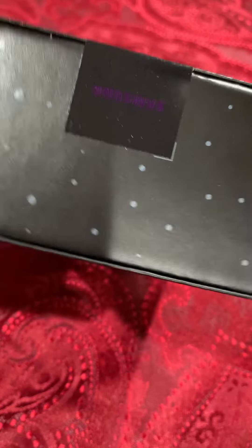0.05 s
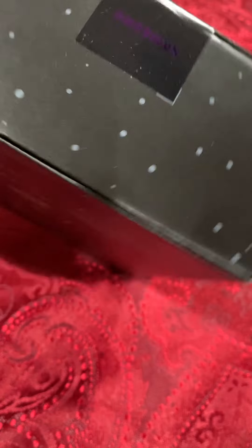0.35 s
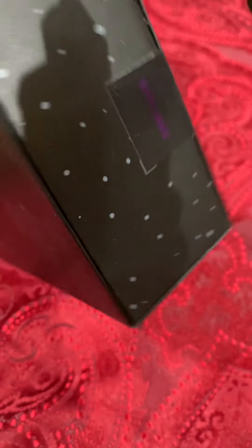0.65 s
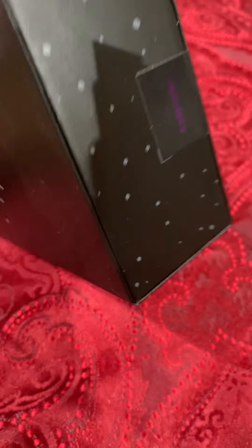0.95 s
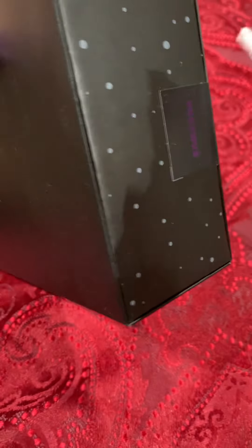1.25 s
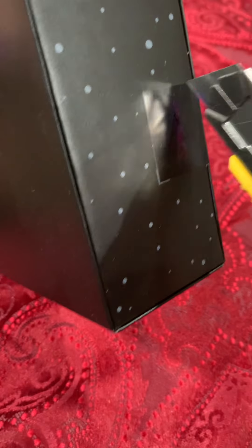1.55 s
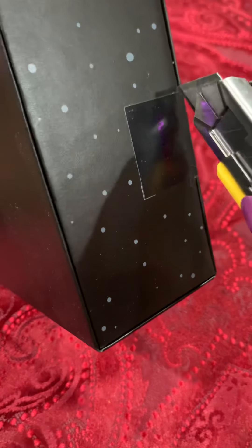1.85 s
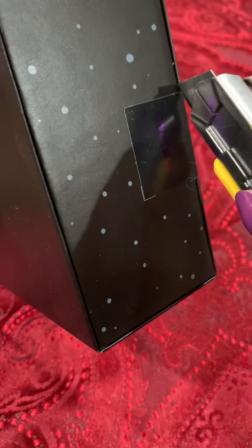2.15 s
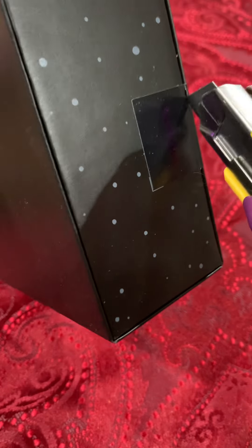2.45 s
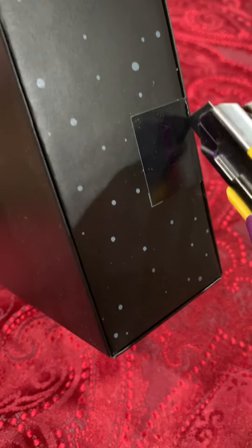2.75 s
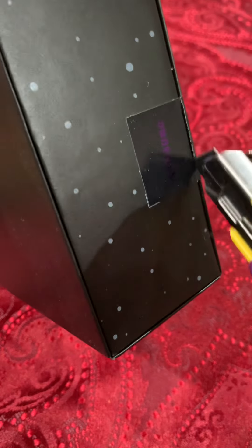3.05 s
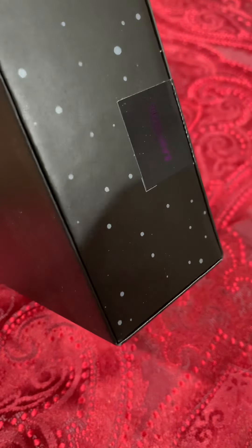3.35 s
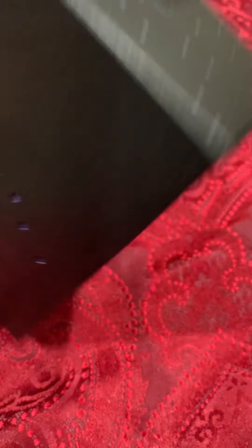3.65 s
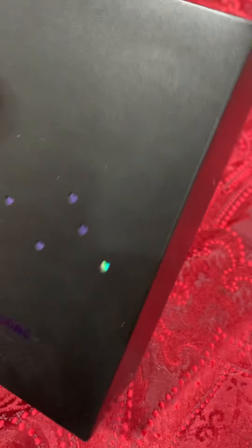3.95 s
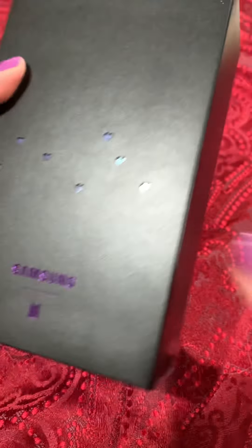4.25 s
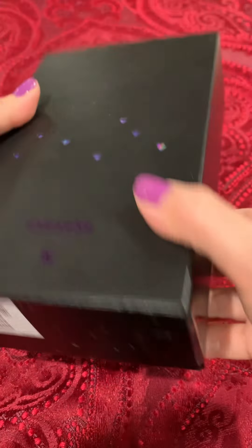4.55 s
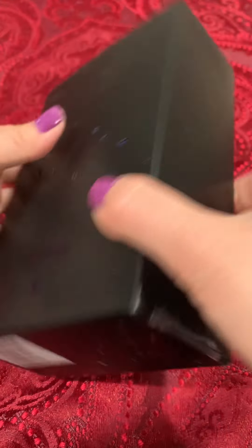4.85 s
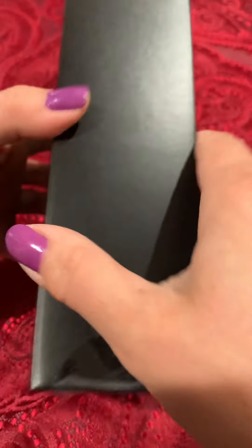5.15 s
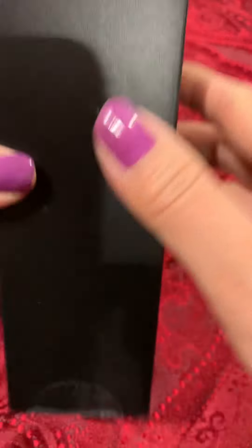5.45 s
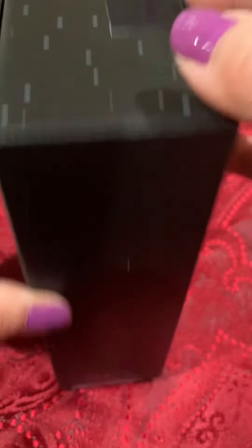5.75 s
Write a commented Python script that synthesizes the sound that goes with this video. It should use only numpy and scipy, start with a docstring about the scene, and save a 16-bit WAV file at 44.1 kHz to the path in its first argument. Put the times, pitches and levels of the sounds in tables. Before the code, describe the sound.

Close up in a small, faintly humming room, a cardboard box is handled with light rubbing and a soft knock. A blade tip ticks and scratches at the sticker sealing it until the seal gives with a crisp pop. The box then lands and rocks on a cloth-covered table, thudding dully as the things inside shift, and fingers slide over the card, bumping it now and then.

```python
"""A stiff cardboard box is unsealed and tipped over on a cloth-covered table, close to a phone.
A craft knife picks at the seal sticker, scrapes and snaps through it, ringing the card walls and
the air inside. The box lands with dull thuds, crumbly slaps and a jostle of its contents, then
fingers hiss and rustle along its smooth sides. A faint hum lies under it all in the small room."""
import sys
import numpy as np
from scipy import signal
from scipy.fft import rfft, irfft, next_fast_len
from scipy.io import wavfile

SR = 44100
rng = np.random.default_rng(int(sys.argv[2]) if len(sys.argv) > 2 else 0)


def unload_audio(sound):
    """Save the sound as a 16-bit wav file, at the path given as the first command line argument."""
    columns = np.transpose(np.atleast_2d(sound))
    # keep every value between -1 and 1, then stretch to whole-number steps
    steps = np.round(np.clip(columns, -1, 1) * 32767)
    wavfile.write(sys.argv[1], SR, steps.astype(np.int16))


N = 264159
TIME = np.arange(N) / SR
RING_TIME = np.arange(int(.7 * SR)) / SR

# The knife tip picks at the sticker. Each row: start in seconds, length in seconds, level in dB,
# treble and hollow ring over that level in dB, pitch of the hollow in Hz.
PICKS = [(1.8432, 0.006, -61.5, -40, 9, 340), (1.9025, 0.006, -60.5, -35, 6, 343),
         (1.939, 0.013, -49, -27, -8, 390), (1.962, 0.01, -53.5, -31, 1, 367),
         (2.006, 0.017, -59.5, -24, 1, 366), (2.343, 0.015, -42, -4.5, 9, 318),
         (2.502, 0.0093, -50, -2.5, -7.5, 319), (2.742, 0.011, -55, -6, -1.5, 357),
         (2.76, 0.027, -47, -5, -1.5, 357), (2.805, 0.0097, -50, -7, -14.5, 366),
         (3.0305, 0.013, -31.5, -5, 6, 365.3)]
# Tone of a hard snap on card. Each row: frequency in Hz, level in dB.
SNAP_TONE = [(150, -61), (700, -12), (1500, -10.5), (2700, -0.5), (4100, -1), (5200, 6.5), (7300, 3.5),
             (9500, 2), (12500, 1), (14500, -5.5), (16000, -20.5)]
# The tipped box lands. Each row: start in seconds, level in dB, pitch in Hz, settling time in seconds.
LANDINGS = [(3.5861, -18.5, 264, 0.029), (3.62, -26, 154, 0.018), (3.809, -19, 182, .014),
            (3.971, -9.5, 233, 0.0232), (4.021, -24.5, 290, 0.018)]
# Corners and faces slap down as it rocks. Each row: start in seconds, wall ring in dB,
# snap over the ring in dB, centre of the ring in Hz.
SLAPS = [(3.5894, -44.5, 11.5, 1255), (3.5993, -45, 15.5, 1250), (3.613, -43.5, 5, 1650),
         (3.6208, -42.5, 8, 1440), (3.8259, -45.5, 2.5, 1380), (3.8285, -46, -17.5, 4300),
         (3.9763, -40.5, 1.5, 1310), (3.984, -45.5, 2, 1250), (3.9922, -44, 7.5, 1320),
         (3.998, -37, 2.5, 4400), (4.0135, -43.5, -5, 4100), (4.042, -48, -2, 1390),
         (4.0518, -40, -10, 1360), (4.056, -42, -0.5, 1336), (4.078, -50.5, -14, 1360)]
# Hands bump the box against the table. Each row: start in seconds, level in dB, pitch in Hz.
BUMPS = [(0.243, -46, 295), (1.114, -28.5, 63), (2.362, -38, 125), (2.515, -41.5, 72.6),
         (4.251, -37.5, 57.6), (4.336, -30.5, 239), (4.623, -44, 436), (5.063, -25.5, 72.5),
         (5.274, -36, 502), (5.803, -37, 66.2), (5.969, -27.5, 120)]


def seal_pops(pop_s=0.00037):
    """The card flexes back in a cycle or two each time the seal lets go."""
    # Each row: time in seconds, peak in dB, pitch in Hz.
    releases = [(1.8455, -39.5, 1110), (1.9048, -47, 1480), (1.9401, -38, 1620), (2.339, -28.5, 1815),
                (2.3473, -25.5, 1050), (2.359, -35.5, 1880), (2.374, -38, 1800), (2.5026, -38.5, 1560),
                (3.030, -13, 1712), (3.0411, -16.5, 1700), (3.0538, -28, 1810)]
    out = np.zeros(N)
    t = np.arange(-SR // 200, SR // 200) / SR
    for s, db, hz in releases:
        add(out, s + t[0], undb(db) * np.exp(-(t / pop_s) ** 2) * np.cos(2 * np.pi * hz * t))
    return out


def knife_picks(wall_db=-2, hollow_db=4, catch_s=0.0062, fall_db=-11.5, ring_hz=1700):
    """The tip catches in a quick, fading run: each catch rings the walls, the whole pull the hollow."""
    boom, catches = np.zeros(N), []
    for s, length, db, treble_db, boom_db, boom_hz in PICKS:
        add(boom, s, undb(db + boom_db + hollow_db) * hollow_ring(boom_hz, length))
        for after in np.arange(0, length, catch_s):
            force_db = db + fall_db * after / length
            catches.append((s + after, force_db + treble_db, force_db + wall_db, ring_hz))
    ticks = taps(catches, snap_t60=0.0046, octaves=0.11, reject_db=16.5)
    return boom + ticks + skid(catches, skid_db=-21.5, rise_s=0.0022, fall_s=0.01)


def blade_scrape(flutter_db=1.5, pick_db=0.5, pick_edge_db=-2, bite_s=0.006, drag_edge_db=-4):
    """The blade bites in a pick and swells in a drag; its slips shake the box and its edge crackles."""
    # Drags through the sticker. Each row: peak time in seconds, half length in seconds, level in dB.
    drags = [(2.351, 0.037, -56), (2.677, 0.0093, -52), (2.765, 0.037, -44), (3.006, 0.054, -51),
             (3.077, 0.049, -44.5)]
    # Tone of the scraped box. Each row: frequency in Hz, level in dB.
    scrape_tone = [(120, 2), (260, 1), (370, 5.5), (520, -1), (740, -8.5), (1000, 3), (1400, -9.5),
                   (1800, -2.5), (2400, -7.5), (3200, -45.5), (4300, -28), (8000, -35)]
    strokes = [(undb(db + pick_db) * swell(s + bite_s, bite_s, length), treble_db + pick_edge_db)
               for s, length, db, treble_db, *_ in PICKS]
    strokes += [(undb(db) * swell(s, width, width), drag_edge_db) for s, width, db in drags]
    body = sum(push for push, _ in strokes)
    edge = sum(push * undb(treble_db) for push, treble_db in strokes)
    slips = grains(rate=2600, spread_db=1.0) * undb(flutter_db * walk(160))
    return body * unit(colour(slips, scrape_tone)) + edge * unit(colour(slips, SNAP_TONE))


def card_clicks(touch_db=-3.5, touch_snap_db=-8):
    """Blade, nails and edges click on the card, often with a lighter touch just before."""
    # Each row: start in seconds, wall ring in dB, snap over the ring in dB, centre of the ring in Hz,
    # lead of the lighter touch in seconds (0 for none).
    clicks = [(0.2164, -37.5, -1, 2840, 0), (0.969, -56.5, -1, 1300, 0), (1.565, -49.5, -0.5, 2450, 0.0014),
              (1.753, -63, 8.5, 2450, 0), (3.0337, -33.5, 11, 1900, 0.00054),
              (3.0488, -38, 7.5, 1810, 0.0021), (3.051, -40, 6, 1740, 0.0015),
              (3.1462, -49, 5.5, 2340, 0.0036), (3.251, -73, -11, 1928, 0.0012),
              (3.398, -47.5, 10.5, 1662, 0.015), (3.743, -61, 5, 1530, 0.0057),
              (4.333, -60.5, 9.5, 1328, 0.025), (5.274, -62.5, 0, 1370, 0),
              (5.906, -61, 11.5, 1510, 0.00077), (5.922, -52, 10.5, 2130, 0),
              (5.971, -53.5, 4.5, 1420, 0.004)]
    contacts = [(s, db + snap_db, db, hz) for s, db, snap_db, hz, _ in clicks]
    contacts += [(s - lead, db + snap_db + touch_db + touch_snap_db, db + touch_db, hz)
                 for s, db, snap_db, hz, lead in clicks if lead > 0]
    ticks = taps(contacts, snap_t60=.009, octaves=0.49, reject_db=22.5)
    return ticks + skid(contacts, skid_db=-8.5, rise_s=0.0022, fall_s=0.011)


def landing_blows(step_db=-4, pitch_ratio=0.554):
    """Corner, edge and face come down in turn, each blow weaker and deeper than the last."""
    return [(s + settle_s * k / 2, db + k * step_db, hz * pitch_ratio ** k)
            for s, db, hz, settle_s in LANDINGS for k in range(3)]


def table_thuds(blows, gain_db, ring_db, damping=0.56, cloth_hz=520, travel_s=0.00653):
    """Cloth-cushioned blows bend the table top: the highs arrive first, then its modes ring on."""
    # Each row: frequency in Hz, level in dB, decay to -60 dB in seconds.
    table_modes = [(58.8, -4, 0.53), (87.9, -2.5, 0.24), (135.7, -1, .23), (200.6, -4.5, .22),
                   (236.7, -7.5, .34), (279.3, -4, 0.26), (299.2, 1, 0.2), (367.4, -6.5, 0.25),
                   (414, -8, 0.14), (486, -6.5, 0.14), (516.4, -0.5, 0.26), (660, -5, .15)]
    out = np.zeros(N)
    f = np.fft.rfftfreq(len(RING_TIME), 1 / SR)
    cloth = 1 / (1 + (f / cloth_hz) ** 8)
    bending = np.exp(-4j * np.pi * travel_s * np.sqrt(100 * f))  # travel_s is the delay at 100 Hz
    for s, db, hz in blows:
        w = 1j * f / hz
        bounce = w / (1 + damping * w + w * w)
        thud = irfft(bounce * cloth * bending)[:SR // 10]
        modes = ring(table_modes, scatter_db=3, detune=.012)
        sound = undb(ring_db) * signal.fftconvolve(thud, modes)
        sound[:len(thud)] += thud
        add(out, s, sound * undb(db + gain_db) / np.abs(sound).max())
    return signal.sosfilt(signal.butter(3, 42, "high", fs=SR, output="sos"), out)


def card_slaps(crease_db=-8, crease_s=0.015):
    """The card slaps down and skids, then creases, which keeps its walls ringing."""
    contacts = [(s, db + snap_db, db, hz) for s, db, snap_db, hz in SLAPS]
    slaps = taps(contacts, snap_t60=0.008, octaves=0.27, reject_db=14)
    skids = skid(contacts, skid_db=-7, rise_s=0.0025, fall_s=0.004)
    strain = sum(undb(db + crease_db) * swell(s + .003, .003, crease_s) for s, db, *_ in SLAPS)
    walls = wall_ring(db=0, centre_hz=1300, octaves=.3, reject_db=11)
    walls /= np.sqrt(np.sum(walls ** 2))
    creases = signal.fftconvolve(strain * grains(rate=1500, spread_db=1.5), walls)[:N]
    return slaps + skids + creases


def contents_jostle(jostle_db=-20, jostle_s=0.0287):
    """The packed contents shake inside the box after each landing."""
    # Each row: frequency in Hz, level in dB.
    contents_tone = [(40, 0), (80, 8), (170, -4), (280, 1), (400, 2.5), (560, -16.5), (750, -25.5),
                     (1200, -35)]
    shaking = sum(undb(db + jostle_db) * swell(s + .008, .005, jostle_s) for s, db, *_ in LANDINGS)
    return shaking * unit(colour(grains(rate=890, spread_db=1.5), contents_tone))


def sliding_hands(rustle_db=-3.0, palm_db=-9, grip_db=-26):
    """Skin hisses on the card and murmurs in the hollow; coarser slips rustle and ring the panels."""
    # Fingers and cloth sweep the box. Each row: peak time in seconds, half length in seconds,
    # hiss in dB, rustle over the hiss in dB, panel resonance in Hz, its level over the rustle in dB,
    # centre of the hiss in Hz.
    sweeps = [(0.099, 0.045, -62.5, 3, 1800, -7.5, 7640), (0.191, 0.038, -60.5, 4, 2080, -4.5, 7050),
              (0.325, 0.084, -69.5, 7.5, 1483, -0.5, 6500), (0.561, 0.087, -73, 8, 1100, -5, 6200),
              (0.794, 0.054, -64, 6.5, 2330, -2, 7140), (0.937, 0.012, -65, 2, 2360, -9, 8050),
              (0.974, 0.01, -75, 27.5, 1137, -7.5, 7000), (1.131, 0.047, -67, 1, 1590, -9.5, 8800),
              (1.388, 0.048, -73, 3, 1600, 0, 6900), (4.325, 0.11, -82.5, 12.5, 1390, -1, 8100),
              (4.53, 0.042, -56.5, -9.5, 1460, -6, 9200), (4.723, 0.043, -47.5, -10, 2440, -10.5, 10440),
              (4.859, 0.036, -57.5, -1, 1670, -16, 8000), (4.994, 0.039, -66.5, -4.5, 2180, -10, 8900),
              (5.154, 0.13, -59, -2.5, 1570, -15, 8300), (5.31, 0.068, -70.5, 1, 1475, 0, 7050),
              (5.457, 0.099, -55.5, -18, 1710, 2.5, 11000), (5.628, 0.098, -63, -5.5, 1440, -14, 9800),
              (5.815, 0.09, -57.5, -5.5, 1718, -12.5, 8150), (5.997, 0.074, -49.5, 1.5, 1300, -19, 8600)]
    # Tones of skin, walls and a palm heard through the box. Each row: frequency in Hz, level in dB.
    skin_tone = [(1000, -16), (3200, -8), (4200, 4), (5200, -0.5), (6500, 5.5), (8500, 3), (10500, 1.5),
                 (12400, -3.5), (14300, 4.5), (15800, 5.5)]
    rustle_tone = [(100, -18), (300, -21), (450, -41), (720, -7), (1050, 1.5), (1650, -4.5), (2400, -2.5),
                   (3100, -3), (3900, -2.5), (5200, -5), (7000, -5), (14000, -39.5)]
    palm_tone = [(90, -18), (220, -0.5), (310, 1.5), (480, -10), (700, -11), (1200, -43.5)]
    slips = grains(rate=1500, spread_db=2.2) * undb(2.5 * walk(60))
    skin = colour(grains(rate=7300, spread_db=-1.0), skin_tone) * undb(1.9 * walk(40))
    pressure, roughness, hiss, panels = np.zeros((4, N))
    for s, width, db, coarse_db, panel_hz, panel_db, skin_hz in sweeps:
        push = undb(db) * swell(s, width, width)
        pressure += push
        roughness += push * undb(coarse_db)
        hiss += push * unit(resonate(skin, skin_hz, width_hz=skin_hz))
        panel = unit(resonate(slips, panel_hz, width_hz=.42 * panel_hz))
        panels += push * undb(coarse_db + panel_db) * panel
    # The grip slips at each bump.
    grip = sum(undb(db + grip_db) * swell(s + 0.0045, 0.0124, 0.0095) for s, db, _ in BUMPS)
    fibres = grains(rate=2600, spread_db=1.5) * undb(2 * walk(90))
    rustle = undb(rustle_db) * roughness * unit(colour(fibres, rustle_tone))
    palm = (undb(palm_db) * np.sqrt(pressure * roughness) + grip) * unit(colour(slips, palm_tone))
    return finger_shimmer(hiss + panels + rustle + palm)


def finger_shimmer(x, depth_db=1.6):
    """As the fingers move, each band of the spectrum swells and sinks by itself."""
    out = 0
    for edge_hz in (1000, 1400, 2000, 2800, 4000, 6000, 8000, 11500):
        band = signal.sosfiltfilt(signal.butter(4, edge_hz, fs=SR, output="sos"), x)
        out += band * undb(depth_db * walk(12))
        x = x - band
    return out + x * undb(depth_db * walk(25))


def taps(contacts, snap_t60, octaves, reject_db):
    """Each contact snaps off the card and rings its walls."""
    out = np.zeros(N)
    for s, snap_db, ring_db, centre_hz in contacts:
        add(out, s, snap(snap_db, snap_t60))
        add(out, s, wall_ring(ring_db, centre_hz, octaves, reject_db))
    return out


def snap(db, t60, scatter_db=3.5, size=2048):
    """The bright, very short crack of a hard contact; each spot has its own colour."""
    spot_tone = [(hz, level + scatter_db * rng.standard_normal()) for hz, level in SNAP_TONE]
    burst = rng.standard_normal(size) * fade(t60)[:size]
    return strike(colour(burst, spot_tone), db)


def wall_ring(db, centre_hz, octaves, reject_db, travel_s=0.001965, size=4096):
    """The card rings briefly, most in the modes that the contact favours."""
    # Each row: frequency in Hz, level in dB, decay to -60 dB in seconds.
    wall_modes = [(900, -14, .025), (1020, -7, .025), (1170, -1, .045), (1297, 1, .065), (1410, 0, .05),
                  (1570, -2, .045), (1722, 1.5, .035), (1900, -.5, .018), (2140, -3, .018),
                  (2450, -4, .025), (2950, -6, .025), (3650, -1, .022), (4080, -1, .024), (4350, -2, .018)]
    favoured = [(hz, level - min(6 * (np.log2(hz / centre_hz) / octaves) ** 2, reject_db), t60)
                for hz, level, t60 in wall_modes]
    sound = ring(favoured, scatter_db=2.5, detune=.008, size=size)
    f = np.fft.rfftfreq(size, 1 / SR)
    radiation = f ** 12 / (f ** 12 + 860. ** 12)  # steep low cut at 860 Hz
    bending = np.exp(-4j * np.pi * travel_s * np.sqrt(1000 * f))  # lows cross the panel more slowly
    return strike(irfft(rfft(sound) * radiation * bending), db)


def hollow_ring(hz, pull_s):
    """The air in the box builds up while the blade pulls on the card, then rings down."""
    # Each row: multiple of the pitch, level in dB, decay to -60 dB in seconds.
    air_modes = [(.86, -9, 0.17), (1, -3.5, .055), (1.201, -13.5, 0.054), (1.5, -22, .03),
                 (1.85, -24.5, .04)]
    held = np.minimum(RING_TIME, pull_s)
    out = 0
    for ratio, db, t60 in air_modes:
        loss = np.log(1000) / t60
        envelope = (1 - np.exp(-loss * held)) * np.exp(-loss * (RING_TIME - held))
        out += undb(db) * envelope * np.sin(2 * np.pi * hz * ratio * RING_TIME)
    return out / np.abs(out).max()


def skid(contacts, skid_db, rise_s, fall_s):
    """Around each contact the two surfaces graze each other and crackle."""
    # Each row: frequency in Hz, level in dB.
    graze_tone = [(300, -26), (750, -10.5), (1100, -2), (1500, -9), (2200, -15), (3000, -8), (4200, 2.5),
                  (9000, -24)]
    fine, coarse = np.zeros((2, N))
    t = np.arange(-SR // 20, SR // 10) / SR
    touch = np.exp(-np.abs(t / np.where(t < 0, rise_s, fall_s)))
    for s, snap_db, ring_db, _ in contacts:
        add(fine, s + t[0], touch * undb(snap_db))
        add(coarse, s + t[0], touch * undb(ring_db))
    slips = grains(rate=4000, spread_db=2.5)
    crackle = fine * unit(colour(slips, SNAP_TONE))
    graze = coarse * unit(colour(slips, graze_tone))
    return undb(skid_db) * (crackle + graze)


def mic_ports(x):
    """Two ports hear a small lag and tilt: lows leave the whole box, treble the point of contact."""
    # Each row: frequency in Hz, lead of the left port in milliseconds, left minus right in dB.
    stereo_image = [(50, 0.034, -1.9), (195, 0.052, -4), (480, 0.022, -3), (780, .4, -1), (1020, .11, -2.5),
                    (1380, 0, -3), (1980, .02, -3), (2750, .11, -1.5), (4050, .06, -.8), (5000, .075, 0),
                    (6100, .118, 0), (9100, .117, 0), (11700, .125, 0), (14800, 0.125, 0)]
    size = next_fast_len(N + 64)
    f = np.fft.rfftfreq(size, 1 / SR)
    hz, *columns = np.transpose(stereo_image)
    lag_ms, tilt_db = (np.interp(np.log(f + 1), np.log(hz), c) for c in columns)
    left = undb(tilt_db / 2)
    right = undb(-tilt_db / 2) * np.exp(-2j * np.pi * f * lag_ms / 1000)
    return irfft(rfft(x, size) * np.array([left, right]), size)[:, :N]


def early_echoes(x, wet_db, size=400):
    """Table, hands and box faces throw back a few quick echoes, different at each port."""
    echoes = rng.standard_normal((2, size)) * (rng.random((2, size)) < .06) * fade(.03)[:size]
    echoes /= np.sqrt(np.sum(echoes ** 2, axis=1, keepdims=True))
    return undb(wet_db) * signal.fftconvolve(x[None], echoes, axes=1)[:, :N]


def room(x, wet_db):
    """Diffuse reflections, different at each port, dying soonest in the treble."""
    # Each row: frequency in Hz, decay to -60 dB in seconds, level in dB.
    decay_bands = [(150, 0.33, 0), (600, 0.36, -1), (1600, 0.32, 0), (3800, 0.32, 0), (5200, 0.2, -5),
                   (7000, 0.21, -2), (9500, 0.21, -.5), (12500, 0.1, -3), (16000, 0.05, -3)]
    hz, t60s, db = np.transpose(decay_bands)
    size = len(RING_TIME)
    log_f = np.log(np.fft.rfftfreq(size, 1 / SR) + 1)
    noise = rfft(rng.standard_normal((2, size)))
    tail = sum(irfft(noise * np.interp(log_f, np.log(hz), band), size) * fade(t60)
               for band, t60 in zip(np.diag(undb(db)), t60s))
    tail *= np.clip(RING_TIME / 0.012 - .3, 0, 1)  # a short gap, then a fade-in
    tail /= np.sqrt(np.sum(tail ** 2) / 2)
    return undb(wet_db) * signal.fftconvolve(x[None], tail, axes=1)[:, :N]


def room_tone(air_db=-68):
    """Low noise of still air and a faint, wavering hum."""
    # Tone of the air and partials of the hum. Each row: frequency in Hz, level in dB.
    air_tone = [(22, -36.5), (45, 6), (78, 3.5), (120, 0), (200, -6.5), (320, -12.5), (500, -21.5),
                (800, -22.5), (1500, -29.5), (4000, -28.5), (10000, -31), (16000, -42.5)]
    hum_partials = [(75.4, -70.5), (177.6, -69), (236.9, -79), (296.1, -86), (479.1, -84.5)]
    air = unit(colour(rng.standard_normal(N), air_tone)) * undb(air_db + 1.3 * walk(30))
    hum = sum(undb(db + 0.4 * walk(2.7)) * np.sqrt(2) * np.sin(2 * np.pi * (hz * TIME + rng.random()))
              for hz, db in hum_partials)
    return air + hum


def ring(modes, scatter_db, detune, size=len(RING_TIME)):
    """Decaying modes; the spot that is struck sets each one's share."""
    hz, db, t60 = np.transpose(modes)[:, :, None]
    share, stretch = rng.standard_normal((2, len(modes), 1))
    t = RING_TIME[:size]
    envelopes = undb(db + scatter_db * share) * np.exp(-np.log(1000) * t / t60)
    return np.sum(envelopes * np.sin(2 * np.pi * hz * (1 + detune * stretch) * t), axis=0)


def grains(rate, spread_db):
    """Stick-slip: tiny releases of uneven size at random moments, about `rate` a second."""
    slips = rng.random(N) < rate / SR
    sizes = rng.standard_normal(N) * undb(spread_db * np.minimum(rng.exponential(size=N), 4))
    return unit(slips * sizes)


def swell(s, rise_s, fall_s):
    """Pressure of one short stroke, greatest at s."""
    distance = np.abs((TIME - s) / np.where(TIME < s, rise_s, fall_s))
    return np.exp(-np.minimum(distance, 20) ** 1.74)


def walk(rate):
    """Random drift through `rate` new values a second."""
    knots = rng.standard_normal(N // 20)
    return 1.82 * np.interp(TIME * rate, np.arange(len(knots)), knots)


def colour(x, tone, size=4096):
    """Minimum-phase equaliser through (Hz, dB) points, so attacks have no pre-ring."""
    hz, db = np.transpose(tone)
    log_f = np.log(np.fft.rfftfreq(size, 1 / SR) + 1)
    cepstrum = irfft(np.log(undb(np.interp(log_f, np.log(hz), db))))
    cepstrum[1:size // 2] *= 2
    cepstrum[size // 2 + 1:] = 0
    return signal.fftconvolve(x, irfft(np.exp(rfft(cepstrum))))[:len(x)]


def resonate(x, hz, width_hz):
    """One broad resonance, run twice for steep sides."""
    b, a = signal.iirpeak(hz, hz / width_hz, fs=SR)
    return signal.lfilter(b, a, signal.lfilter(b, a, x))


def fade(t60):
    """Decay by 60 dB in t60 seconds."""
    return np.exp(-np.log(1000) * RING_TIME / t60)


def strike(x, db):
    """Scale a blow by the rms of its first 10 ms."""
    return x * undb(db) / np.sqrt(np.mean(x[:SR // 100] ** 2))


def undb(db):
    """Decibels to gain."""
    return 10 ** (np.asarray(db) / 20)


def unit(x):
    """Scale to rms 1."""
    return x / np.sqrt(np.mean(x ** 2))


def add(track, s, sound):
    """Mix a sound into a track at s seconds."""
    i = max(int(s * SR), 0)
    track[i:i + len(sound)] += sound[:max(N - i, 0)]


def scene():
    """Everything happens on the table, a hand's length from the phone."""
    knife = card_clicks() + knife_picks() + seal_pops() + blade_scrape()
    hands = sliding_hands()
    landing = card_slaps() + contents_jostle()
    thuds = table_thuds(landing_blows(), gain_db=-4.0, ring_db=-48.5)
    thuds += table_thuds(BUMPS, gain_db=-1.0, ring_db=-52.0)
    early = early_echoes(knife + landing + hands, wet_db=-16)
    reverb = room(knife, wet_db=-20.5) + room(landing, wet_db=-16)
    reverb += room(hands, wet_db=-11) + room(thuds, wet_db=-18)
    direct = mic_ports(knife + landing + thuds + hands + room_tone())
    return direct + early + reverb


def record(dry, hiss_db=-90, low_hz=30, top_hz=16450):
    """The phone adds a little hiss and cuts the deepest rumble and the top."""
    sound = signal.sosfilt(signal.butter(2, low_hz, "high", fs=SR, output="sos"), dry)
    sound += undb(hiss_db) * rng.standard_normal((2, N))
    return signal.sosfiltfilt(signal.ellip(8, .1, 60, top_hz, fs=SR, output="sos"), sound)


dry = scene()
out = record(dry)
unload_audio(out)
```